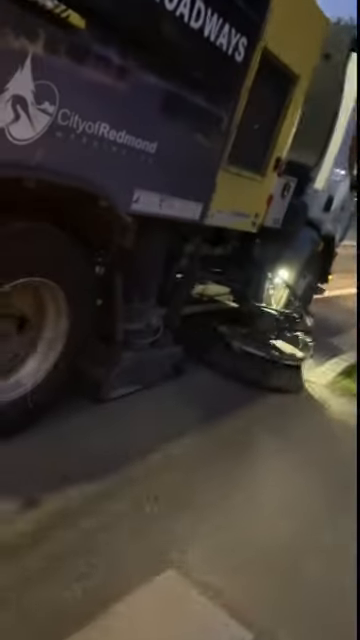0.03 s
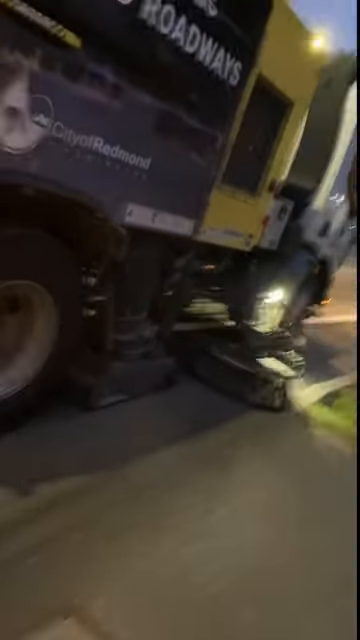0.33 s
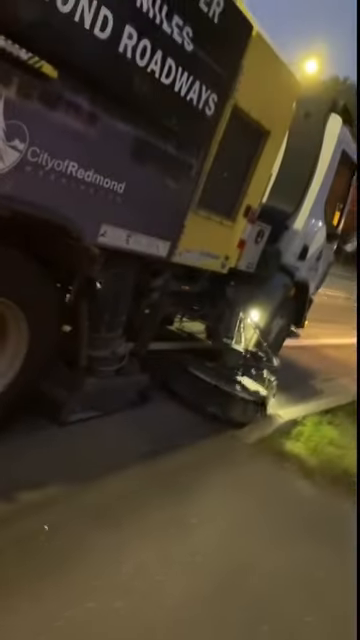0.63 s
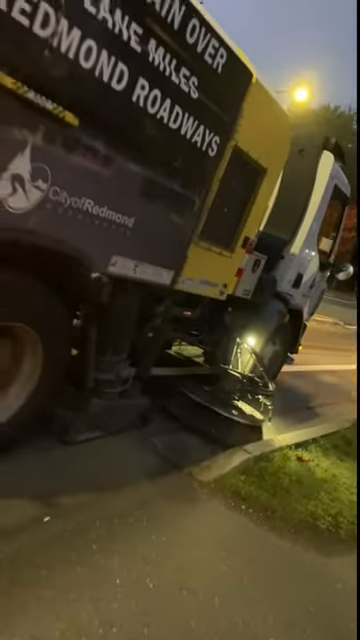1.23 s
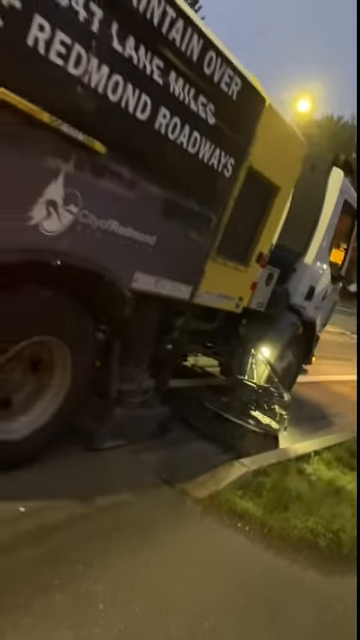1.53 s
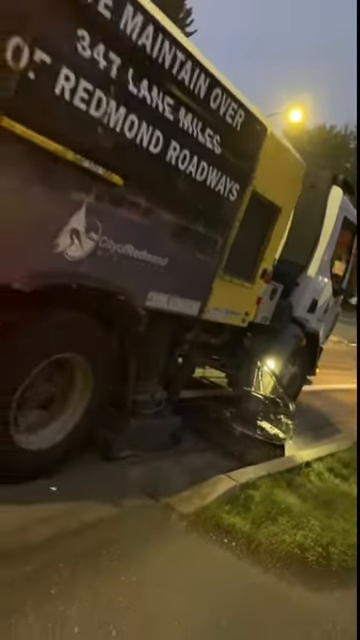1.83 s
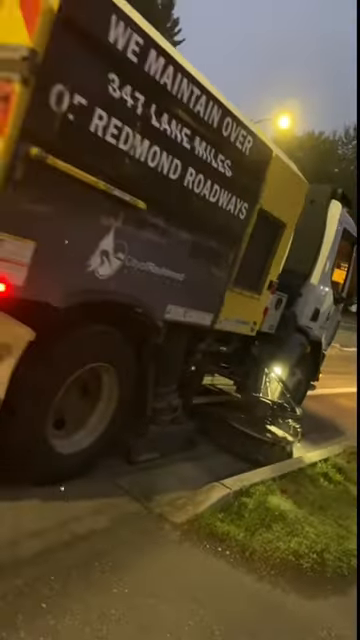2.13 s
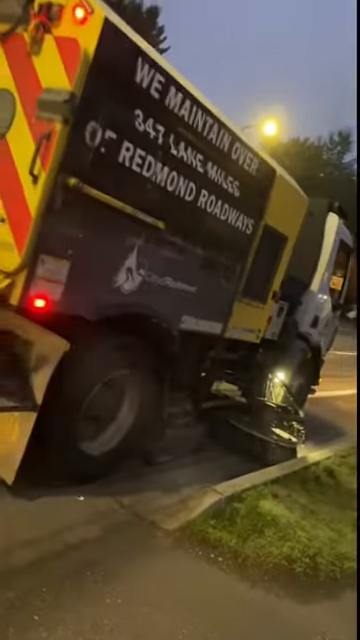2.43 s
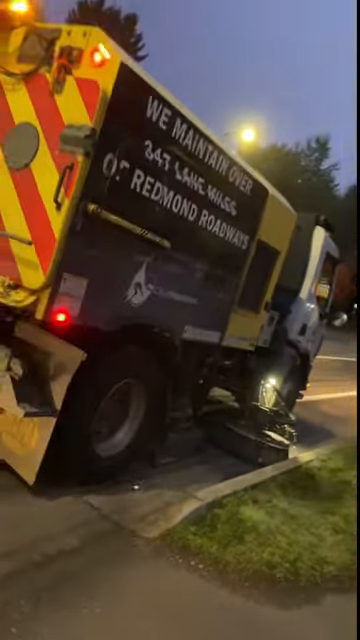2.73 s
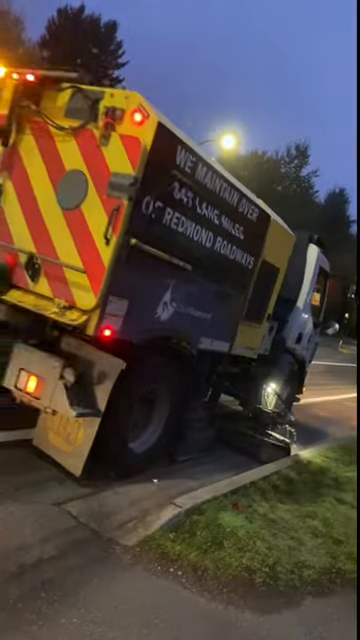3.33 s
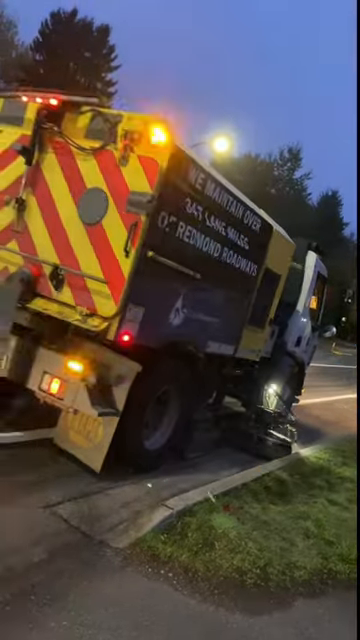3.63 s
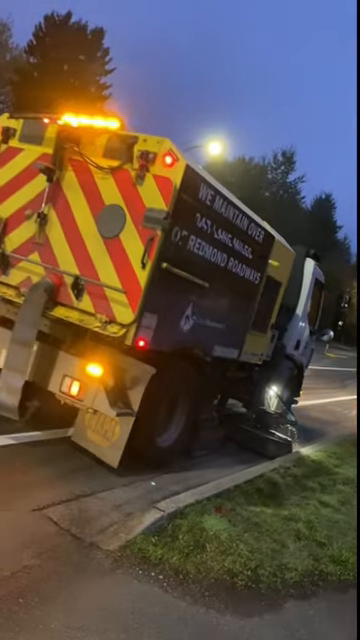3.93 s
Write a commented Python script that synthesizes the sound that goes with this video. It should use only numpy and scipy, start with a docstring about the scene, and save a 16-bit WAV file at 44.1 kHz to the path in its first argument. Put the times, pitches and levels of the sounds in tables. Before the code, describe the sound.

A street sweeper roars past close by, its broom scratching over wet asphalt.

```python
"""A suction fan roars at arm's length as a street sweeper creeps past and draws away along the kerb.
The roar is air rushing through duct and hopper, over the diesel's rumble and a few steady hums.
The steel gutter broom scratches the wet asphalt, rasps and squeaks briefly, in a hiss of air and spray.
Two close microphone ports hear it, the left a little earlier than the right."""
import sys
import numpy as np
from scipy import signal
from scipy.fft import rfft, irfft, next_fast_len
from scipy.io import wavfile
from scipy.ndimage import uniform_filter1d, map_coordinates

SR = 44100
rng = np.random.default_rng(int(sys.argv[2]) if len(sys.argv) > 2 else 0)


def master_out(mix):
    """Clip the mix to full scale and print it as 16-bit PCM to the path in sys.argv[1]."""
    frames = np.transpose(np.atleast_2d(mix))
    ceiling = np.clip(frames, -1, 1)
    pcm = np.round(ceiling * 32767).astype(np.int16)
    wavfile.write(sys.argv[1], SR, pcm)


N = 176400


def fan(level_db, trim_db=-.4):
    """Air roars through duct and hopper, changing colour as the tail comes round."""
    # the roar's colour beside and behind the truck: freq_hz, relative_db
    side_eq = [(60, -30), (100, -6.5), (135, -1.2), (180, -.3), (235, -2), (275, -5.5), (315, -2.4),
               (380, -6.5), (440, -9), (480, -7.5), (520, -11), (600, -7), (670, -11), (745, -7),
               (820, -17), (1100, -21), (1500, -45)]
    rear_eq = [(60, -30), (100, -4.5), (130, 0), (165, -3.5), (210, 1), (260, -5), (310, -3.5), (370, -9.5),
               (410, -7.5), (440, -7.7), (495, -4), (550, -7.5), (610, -7.3), (680, -12), (780, -15),
               (1100, -21), (1500, -45)]
    return amp(level_db + trim_db) * turning(rush(side_eq, patchy_db=.6), rush(rear_eq, patchy_db=.6))


def diesel(shaft_hz=29.61, rumble_trim_db=-.3, orders_db=-37.5):
    """The engine's strongest orders over the low rumble of exhaust and air."""
    # the rumble's fader: time_s, level_db
    rumble_fader = [(0, -33), (.15, -22), (.33, -24.5), (.44, -30), (.53, -26.5), (.63, -30), (.8, -25),
                    (.98, -23), (1.18, -26.5), (1.29, -21), (1.42, -26.5), (2.0, -25.7), (2.52, -25.5),
                    (2.66, -30.5), (3.14, -30), (3.45, -27.5), (4, -28.5)]
    # the rumble's colour: freq_hz, relative_db
    rumble_eq = [(20, -42), (30, -30), (40, -9.5), (50, -5.5), (66, .2), (85, -.6), (105, -5), (140, -21),
                 (250, -58)]
    # engine tones: shaft_multiple, relative_db
    orders = [(6, -1), (10, 0.5), (16, -4), (20, -6), (25, -9)]
    shaft = spin(shaft_hz, drift=.003)
    level_db, = curves(rumble_fader)
    rumble = rush(rumble_eq, patchy_db=.5)
    power = uniform_filter1d(np.mean(rumble ** 2, axis=0), size=SR // 4)
    rumble /= np.sqrt(np.abs(power) + 1e-9)  # evened out, so the fader shapes the swells
    drone = sum(amp(db) * tone(multiple * shaft) for multiple, db in orders)
    return amp(level_db + rumble_trim_db) * rumble + amp(orders_db) * drone


def hums():
    """Engine, fan and pump tones that swell and fade as the truck slides by."""
    # each hum and its fader: pitch_hz, [(time_s, level_db), ...]
    voices = [(70, [(0, -36), (.17, -26), (.33, -29), (.5, -41), (.65, -41), (.8, -29), (1.0, -27),
              (1.3, -29), (1.5, -42), (2.4, -38), (2.8, -52), (4, -46)]), (130.5, [(0, -46), (2.6, -40),
              (3.4, -31.5), (4, -35)]), (262.5, [(0, -27), (.25, -27.5), (.65, -34), (1.05, -25.5),
              (1.5, -34), (2.05, -29.5), (2.25, -40), (4, -43)]), (408.5, [(0, -41), (.75, -35.5),
              (1.33, -48), (1.6, -36.5), (2.3, -32.5), (3.1, -31.2), (3.45, -35), (3.8, -42)]),
              (608.5, [(0, -34.5), (.6, -42), (1.15, -36), (1.6, -41), (2.6, -45), (4, -52)]),
              (738.5, [(0, -43), (.25, -40), (.4, -29), (.52, -38), (.8, -48), (1.0, -36), (1.2, -32.5),
              (1.5, -46), (1.75, -39), (2.2, -50), (3.15, -45), (4, -60)]), (984, [(0, -49), (1.4, -44),
              (4, -55)])]
    return sum(amp(curves(fader)[0]) * tone(spin(hz, drift=.004)) for hz, fader in voices)


def broom(level_db, trim_db=-.1, ticks_per_s=1800, tick_db=-7.5, tick_spread_db=2.5):
    """Steel bristles flick over the asphalt: a dense scratch of tiny ticks."""
    # the scratch's colour beside and behind the truck: freq_hz, relative_db
    side_eq = [(600, -33), (900, -4.5), (1050, -0.5), (1500, -3.3), (1900, -4.7), (2300, -6.2),
               (2800, -5.5), (3250, -7.6), (3700, -10), (5000, -15), (8000, -29.5), (16000, -47)]
    rear_eq = [(600, -33), (900, -5), (1050, -1), (1400, -2.8), (1750, -3.3), (2300, -7.6), (2800, -7.2),
               (3350, -8), (3700, -10.8), (5000, -15), (8000, -29.5), (16000, -47)]
    flicks = rng.random((2, N)) < ticks_per_s / SR
    ticks = flicks * rng.standard_normal((2, N))
    ticks *= amp(tick_spread_db * rng.standard_normal((2, N)))
    brushing = turning(rush(side_eq, patchy_db=.9), rush(rear_eq, patchy_db=.9))
    scratch = brushing + amp(tick_db) * spread(ticks, side_eq)
    return amp(level_db + trim_db + .25 * wobble(26)) * unit(reflections(scratch))


def rasps():
    """The broom presses down now and then and scrapes more harshly."""
    # the bristles bite: time_s, peak_db, half_length_s
    bites = [(.44, -36, .05), (.78, -33, .05), (1.0, -37, .07), (1.5, -36, .05)]
    # the scrape's colour: freq_hz, relative_db
    rasp_eq = [(1000, -30), (1700, 0), (2400, -4), (3300, -2), (4500, -18), (8000, -45)]
    return sum(swell(*bite) for bite in bites) * rush(rasp_eq, patchy_db=2)


def squeaks(slips_per_s=150, roughness_rad=.5):
    """A bristle catches and sings briefly on a rough note."""
    # caught bristles: time_s, pitch_hz, peak_db, half_length_s
    catches = [(.307, 4555, -24.5, .008), (.309, 4330, -29, .016), (.775, 1720, -31, .03)]
    sound = np.zeros(N)
    for time_s, pitch_hz, peak_db, half_length_s in catches:
        phase = spin(pitch_hz, drift=.004) + roughness_rad * wobble(slips_per_s)
        sound += swell(time_s, peak_db, half_length_s) * np.sin(phase)
    return sound


def hiss(level_db, trim_db=5.6):
    """Air and water spray hiss under the truck."""
    # the spray's colour: freq_hz, relative_db
    spray_eq = [(2500, -28), (4200, -5.7), (5100, -2.8), (6200, -2.8), (7400, -1.6), (8700, .5),
                (11000, -.1), (13500, -1.6), (15600, -2.3)]
    return amp(level_db + trim_db + .2 * wobble(30)) * rush(spray_eq, patchy_db=1.0)


def rings():
    """Air and scraping keep duct and broom ringing, each note loudest as its outlet faces us."""
    # resonances: pitch_hz, facing_s, peak_db, fall_db_per_s, half_width_hz
    resonances = [(474, 2.2, -35.5, 3, 14), (750, .7, -40, 4.5, 22), (1110, 1, -48.5, 2.5, 10),
                  (1573, 1.5, -50, 2, 14), (2900, .7, -48, 1.4, 280), (5150, .5, -48.5, .7, 260)]
    sound = np.zeros(N)
    for pitch_hz, facing_s, peak_db, fall_db_per_s, half_width_hz in resonances:
        band = filtered(rng.standard_normal(N), lambda hz: 1 / (1 + ((hz - pitch_hz) / half_width_hz) ** 2))
        sound += amp(peak_db - fall_db_per_s * np.abs(clock() - facing_s)) * unit(band)
    return sound


def reflections(x):
    """Adds bounces off road and panels: a comb that shifts slowly as the truck moves."""
    # bounce paths: delay_s, growth_s_per_s, gain
    paths = [(.0043, -.00012, .12), (.0117, .0001, .18), (.023, .00016, .2), (.041, .00008, .2)]
    t = clock()
    return x + sum(gain * np.array([np.interp(t - delay_s - growth * t, t, side, left=0) for side in x])
                   for delay_s, growth, gain in paths)


def turning(beside, behind, start_s=1.18, end_s=3.6):
    """An equal-power crossfade from the truck's side to its tail."""
    blend = np.clip((clock() - start_s) / (end_s - start_s), 0, 1)
    return np.sqrt(1 - blend) * beside + np.sqrt(blend) * behind


def rush(eq, patchy_db):
    """Turbulent stereo noise, with random patches of gain across time and frequency."""
    spectra = signal.stft(rng.standard_normal((2, N)), nperseg=512)[2]
    patches = uniform_filter1d(rng.standard_normal(spectra.shape[1:]), size=7, axis=0)
    patches = uniform_filter1d(patches, size=6, axis=1)
    noise = signal.istft(spectra * amp(patchy_db * unit(patches)), nperseg=512)[1]
    return spread(noise[:, :N], eq)


def spread(pair, eq, mono_hz=190):
    """Two unrelated signals become a coloured, partly alike stereo pair of rms 1 with mono bass."""
    # how alike the two ports sound: freq_hz, correlation (capped at 1 below)
    likeness = [(200, .994), (600, .92), (1200, .95), (1800, 1.9), (2500, .78), (3600, .72), (4400, .5),
                (5100, .86), (6100, .66), (6950, .995), (7750, .995), (8700, .73), (10400, .97),
                (12100, .68), (13200, .99), (14000, .99), (15200, .6)]

    def mid_side(hz):
        angle = np.arccos(np.clip(along(likeness, hz), -1, 1)) / 2
        angle *= np.minimum(hz / mono_hz, 1) ** 2
        return amp(along(eq, hz)) * [np.cos(angle), np.sin(angle)]

    mid, side = filtered(pair, mid_side)
    return unit(np.array([mid + side, mid - side]))


def ports(x):
    """The left port gets the treble a little earlier and the lower mids louder."""
    # balance between the ports: freq_hz, left_minus_right_db
    tilt = [(60, 0), (100, .4), (160, 1.5), (270, 2.5), (450, 3.2), (740, 6.3), (1200, 2.7), (1600, 0),
            (2000, -.2), (2700, -1.6), (4200, -1.6), (5500, 0)]
    # phase between the ports: freq_hz, left_lead_rad
    lead = [(2000, 0), (2700, .8), (3600, .65), (4400, 1.35), (4900, .15), (5500, .4), (6350, 2.35),
            (6950, 3.05), (7800, 3.25), (8600, 4.2), (10200, 6.1), (11500, 6.8), (12200, 8.2), (13200, 9.3),
            (14100, 9.55), (14800, 10.9), (15700, 12)]
    sides = np.array([[.5], [-.5]])
    return filtered(x, lambda hz: amp(sides * along(tilt, hz)) * np.exp(1j * sides * along(lead, hz)))


def tone(phase, flutter_db=2.5):
    """A fluttering sine of about rms 1."""
    return np.sqrt(2) * np.sin(phase + 2 * np.pi * rng.random()) * unit(amp(flutter_db * wobble(6)))


def spin(hz, drift):
    """The angle of something turning at a nearly steady speed."""
    return 2 * np.pi * (np.cumsum(hz * (1 + drift * wobble(7))) / SR + rng.random())


def swell(time_s, peak_db, half_length_s):
    """A bell-shaped rise and fall of gain."""
    return amp(peak_db) * np.exp(-((clock() - time_s) / half_length_s) ** 2)


def wobble(knots_per_s):
    """A smooth random curve."""
    return map_coordinates(rng.standard_normal(400), [clock() * knots_per_s + 2], mode="mirror")


def filtered(x, response):
    """x shaped by a complex frequency response."""
    size = next_fast_len(N + SR // 2)
    return irfft(rfft(x, size) * response(np.fft.rfftfreq(size, 1 / SR)), size)[..., :N]


def curves(rows):
    """One automation curve for each column after the time."""
    times_s, *columns = np.transpose(rows)
    return [np.interp(clock(), times_s, column) for column in columns]


def along(points, hz):
    """(freq_hz, value) points read on a log frequency axis."""
    freqs_hz, values = np.transpose(points)
    return np.interp(np.log(hz + 1), np.log(freqs_hz + 1), values)


def clock():
    """Each sample's time in seconds."""
    return np.arange(N) / SR


def amp(db):
    """Decibels to gain."""
    return 10 ** (np.asarray(db) / 20)


def unit(x):
    """Scaled to rms 1."""
    return x / np.sqrt(np.mean(x ** 2) + 1e-20)


def scene():
    """The whole truck, mixed and heard at the two ports."""
    # faders as the truck draws away, before each layer's trim: time_s, fan_db, broom_db, hiss_db
    faders = [(0, -18.6, -27.3, -30.3), (.3, -18.2, -27, -30.4), (.9, -19.4, -27.5, -31.3),
              (1.25, -19, -27.7, -31.2), (1.6, -20, -27.4, -32.5), (2.3, -19.8, -29, -33.6),
              (3.3, -19.4, -30.5, -34.7), (3.65, -20.8, -30.8, -35.5), (4, -22.3, -32.3, -36.7)]
    fan_db, broom_db, hiss_db = curves(faders)
    machinery = diesel() + hums() + fan(fan_db) + rings()
    sweeping = broom(broom_db) + rasps() + squeaks() + hiss(hiss_db)
    return ports(machinery + sweeping)


def record(dry, top_hz=15750):
    """A brick-wall low-pass takes off the very top."""
    return filtered(dry, lambda hz: hz < top_hz)


dry = scene()
out = record(dry)
master_out(out)
```